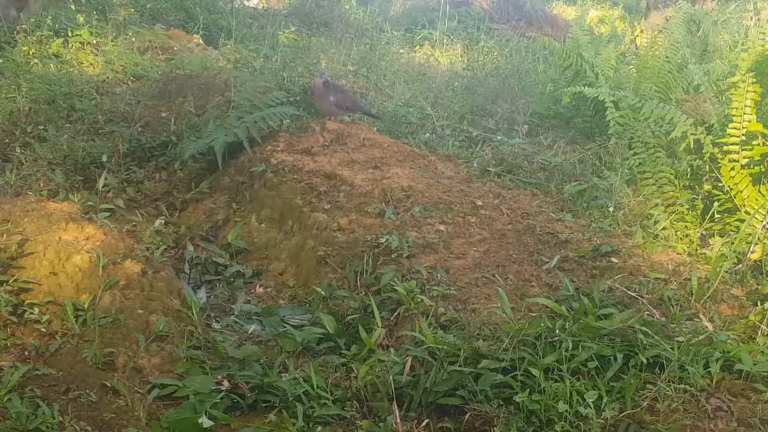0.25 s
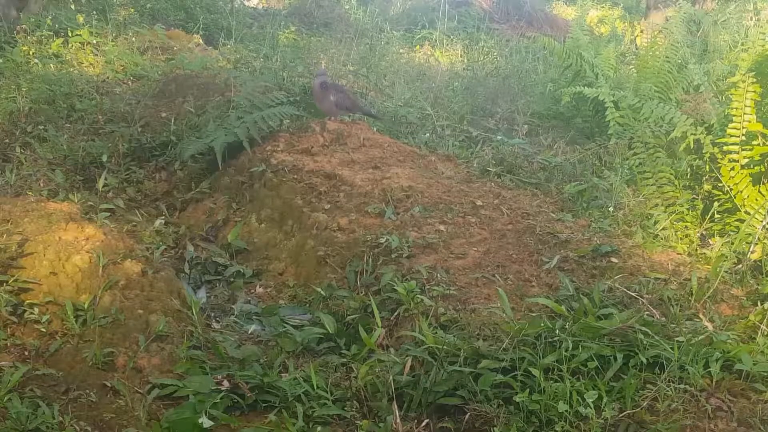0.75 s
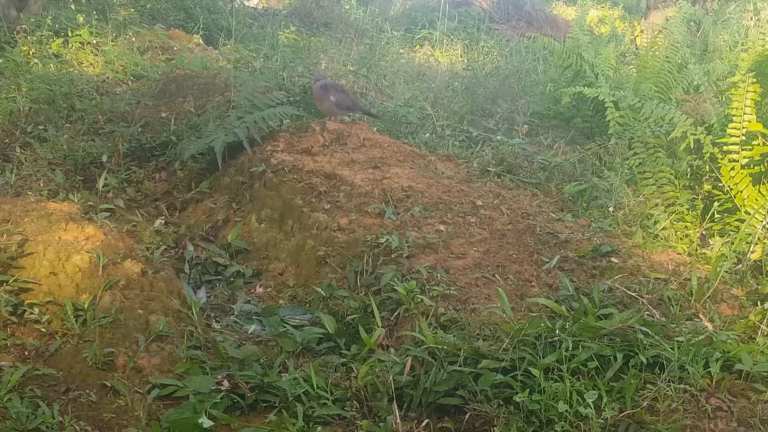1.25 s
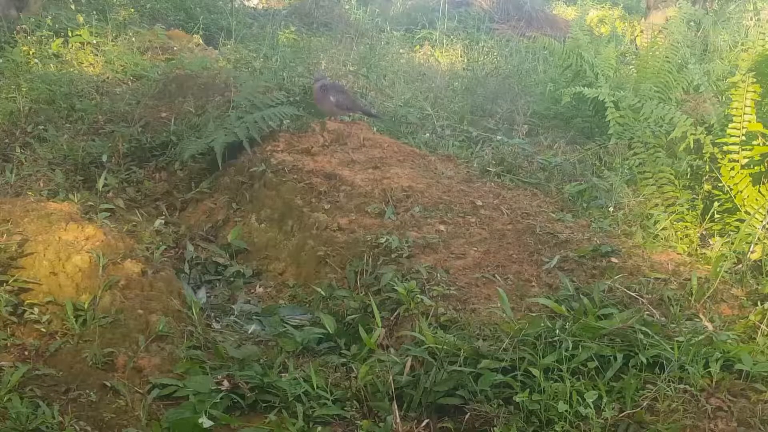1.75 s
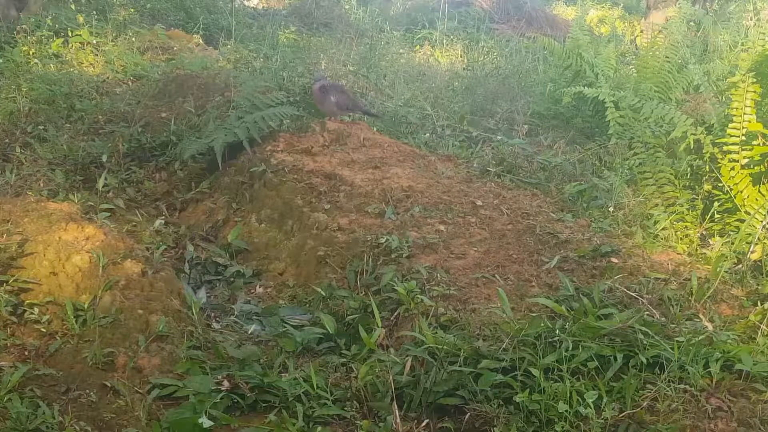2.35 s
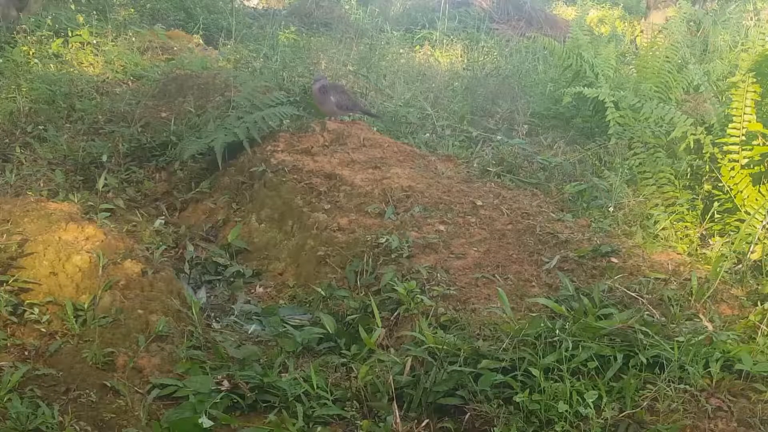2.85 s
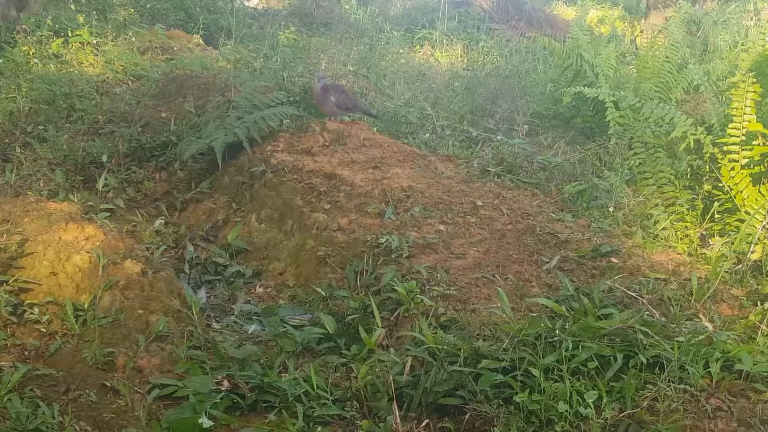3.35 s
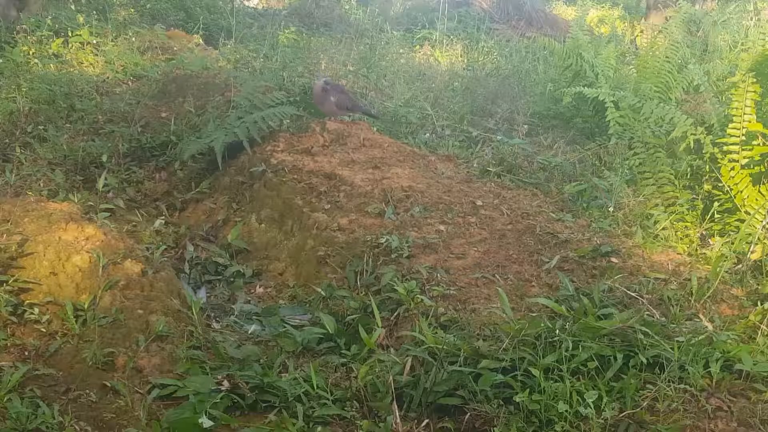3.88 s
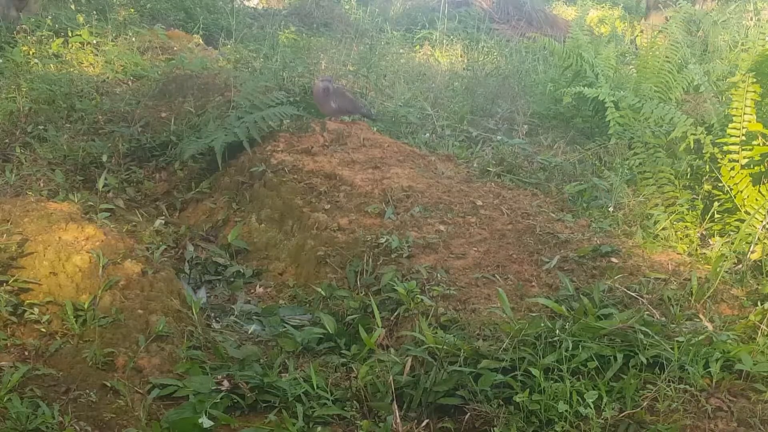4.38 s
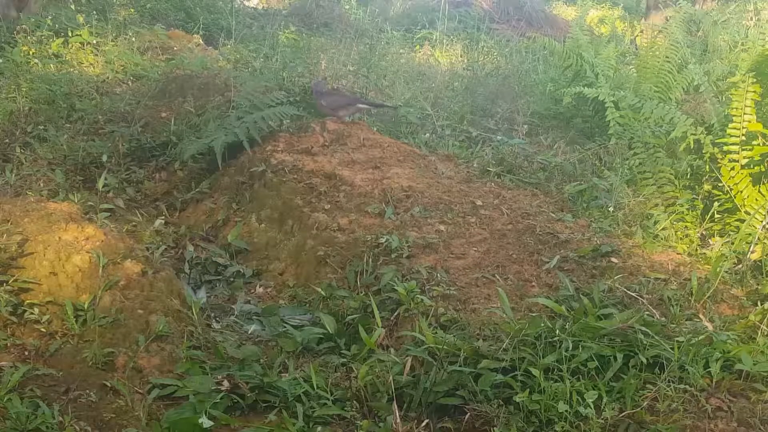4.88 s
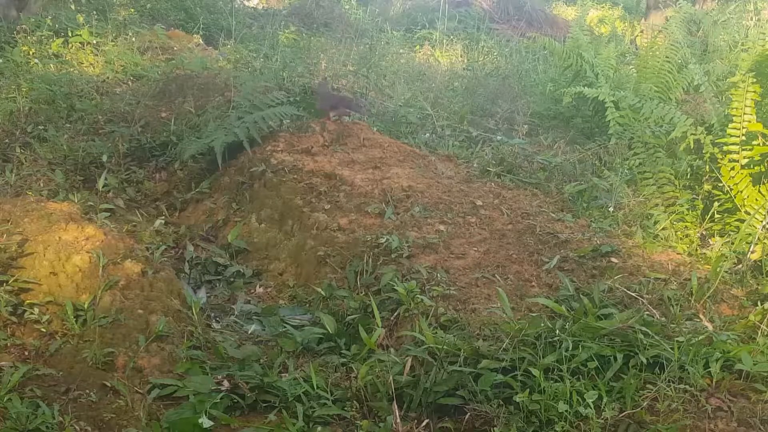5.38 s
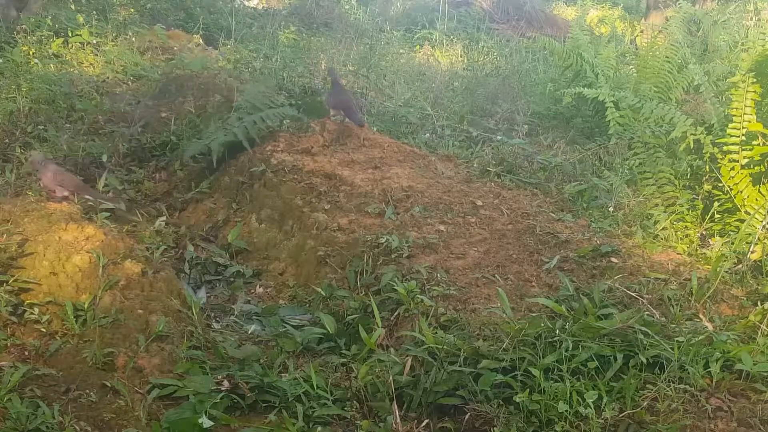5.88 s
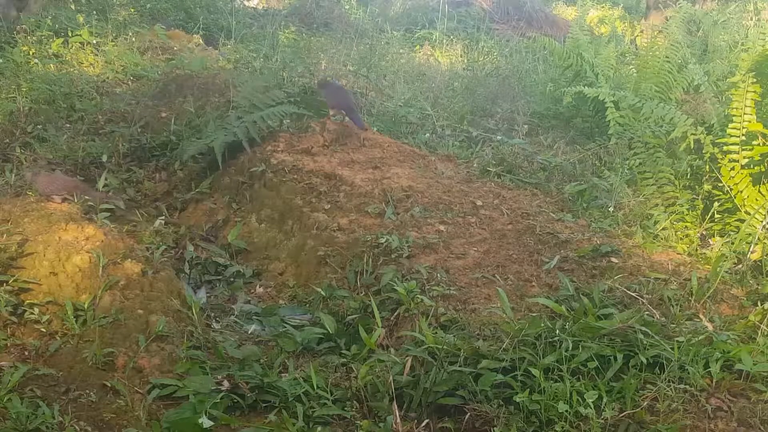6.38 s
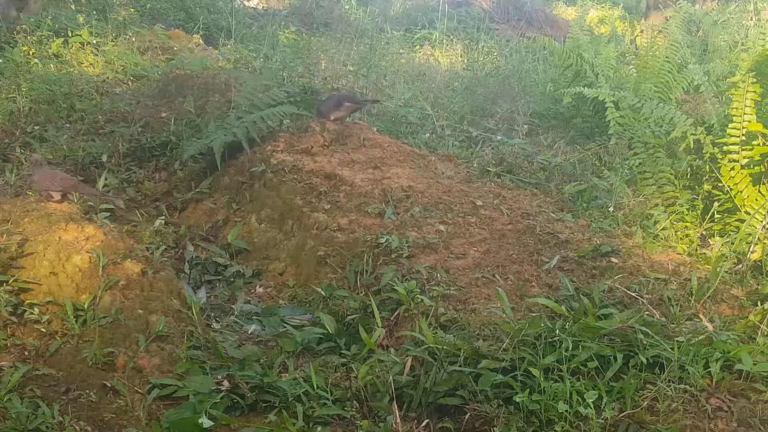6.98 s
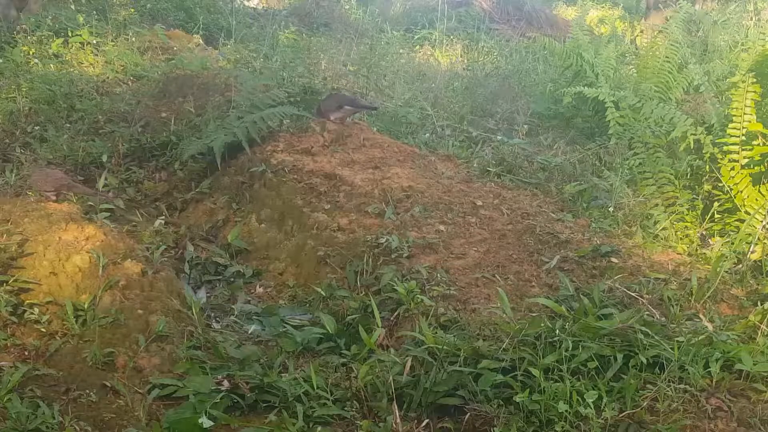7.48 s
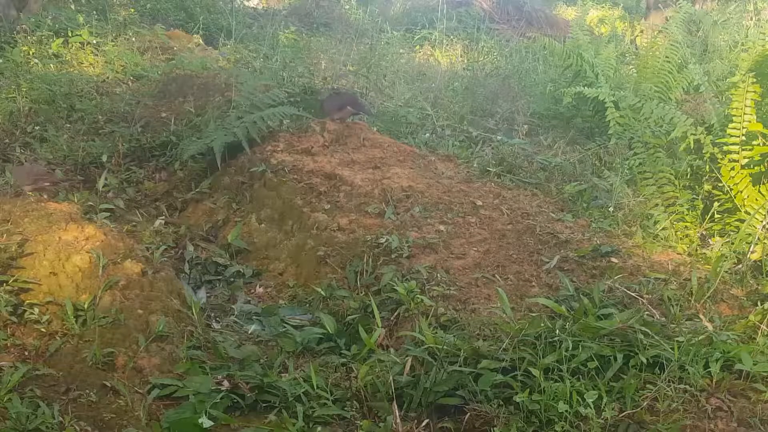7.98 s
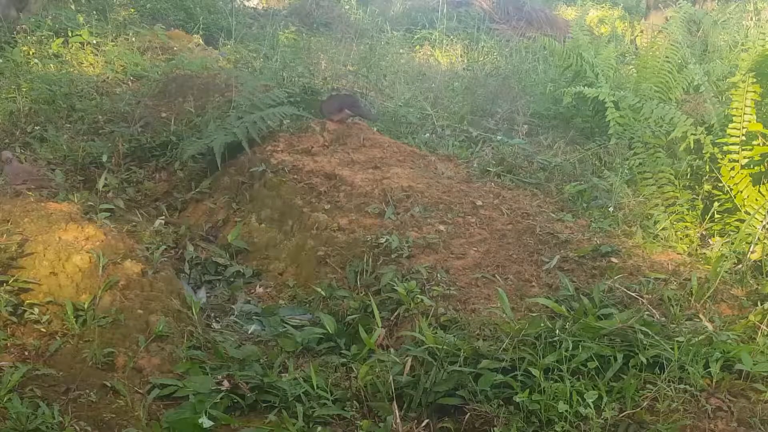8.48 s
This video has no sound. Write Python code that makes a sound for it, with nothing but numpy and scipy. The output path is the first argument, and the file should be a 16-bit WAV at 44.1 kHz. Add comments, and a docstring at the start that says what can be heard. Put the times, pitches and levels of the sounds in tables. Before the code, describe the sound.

Outdoors in a scrubby clearing, a bush cricket chirps rapidly and thinly over insect fizz and very light air. A distant dove on the left coos softly at the start and again near three seconds, around a louder near dove's clear double coo and long purring note. Mid-way, wings flap in with soft low thumps and a breathy rush. Then the near dove gives a run of hoarse, beating coos, ending as a clear coo starts. The stereo microphone is open and quiet.

```python
"""Doves in a scrubby clearing

One dove coos far off to the left, one close by, and a bird lands with a flurry of wings.
Each coo is two throat tones that beat against each other; the wings are puffs, slaps and rushes of noise.
A bush cricket's gated wing tone chirps in threes, and a chorus of smaller insects fizzes as narrow noise.
Swept sines make faint whistles and trills, decaying sines make far knocks, and hiss swells softly.
Light wind and still air are bands of flickering noise, heaviest at the bottom."""
import sys
import numpy as np
from scipy import signal
from scipy.io import wavfile

SR = 44100
rng = np.random.default_rng(int(sys.argv[2]) if len(sys.argv) > 2 else 0)


def master(y):
    """Save y as 16-bit WAV."""
    cut = np.clip(np.atleast_2d(y).T, -1, 1)
    pcm = np.round(cut * 32767)  # scale
    wavfile.write(sys.argv[1], SR, pcm.astype(np.int16))


N = 384993
T = np.arange(N) / SR   # [s]

# Light wind, still air and far leaves: (frequency [Hz], relative density [dB per Hz])
AIR_SPECTRUM = [(15, -24), (30, -7), (60, -3), (140, -9.5), (230, -14), (700, -20.5), (2200, -24),
                (4000, -24), (6200, -64), (8300, -24.5), (9800, -30), (12500, -32), (14500, -36)]
AIR_DB = -62   # level of the whole bed
# Stereo lean of the noise beds: (frequency [Hz], left minus right [dB])
NOISE_LEAN = [(30, -7), (80, -5), (200, -1), (1500, -2.5), (15000, 2)]
# Likeness of the two sides of the noise beds: (frequency [Hz], left-right likeness [0-1])
NOISE_LIKENESS = [(30, .35), (200, .85), (600, .7), (2000, .1)]
# Small insects: (time [s], fizz level [dB], thin tone level [dB])
CHORUS_LEVELS = [(0, -57.5, -70), (8.73, -58.5, -72)]
# Chirps of the cricket: (time [s], rate [chirps per s])
CHIRP_RATE = [(0, 17.499), (1.04, 18.076), (2.92, 16.863), (3.31, 17.577), (4.9, 19.427), (5.02, 19.315),
              (6.39, 18.775), (7.26, 18.643), (8.73, 18.058)]
CHIRP_START = .135   # part of a chirp already sung at 0 s
# Wing strokes in a chirp: (place [part of chirp], width [part of chirp], level [dB], wing tone [Hz])
CHIRP_STROKES = [(.14, .045, -8, 6674), (.36, .045, 0.5, 6857), (.6, .05, 1.5, 6920), (.75, .07, -16, 6907)]
# Cricket, before scatter and pan: (time [s], wing tone level [dB], rasp level [dB], octave level [dB])
CRICKET_LEVELS = [(0, -58, -63, -63), (4.3, -58, -62, -63), (6, -57, -55.5, -62.5),
                  (8.73, -59.5, -52.5, -63.5)]
# Soft swells of hiss, perhaps far leaves: (centre time [s], half length [s], level [dB])
RUSTLE_SWELLS = [(1.38, 0.17, -68), (1.9, 0.2, -69.5), (3.85, 0.16, -73), (7.452, 0.2, -68.5)]
# Soft far knocks: (time [s], starting level [dB], pitch [Hz])
FAR_KNOCKS = [(3.767, -54, 571), (3.968, -55, 556), (4.369, -56.5, 568)]
# Faint whistles: (start [s], end [s], start pitch [Hz], end pitch [Hz], level [dB])
FAINT_WHISTLES = [(.08, .35, 1950, 2380, -73), (1.25, 1.68, 3000, 2750, -75), (1.7, 1.9, 2320, 2320, -75),
                  (2.7, 2.97, 2840, 2840, -74)]
WHISTLE_SHAKE_HZ = 70
# A small bird's groups of three falling notes: (time [s], level of the first note [dB])
BIRD_TRILLS = [(2.425, -61), (2.665, -62), (2.905, -61), (3.145, -62)]
# Returns from ground and bushes: (left delay [s], left level [dB], right level [dB])
ECHO_RETURNS = [(.009, -48, -11.5), (.023, -12.5, -22), (.047, -14.5, -18), (.1, -22, -24)]
# Wing beats and the landing: (time [s], puff level [dB], puff pitch [Hz], feather slap level [dB])
WING_BEATS = [(5.305, -48.5, 327, -71), (5.331, -56, 159, -66), (5.352, -45, 270, -62),
              (5.408, -48, 259, -63), (5.45, -35.5, 348, -58), (5.484, -59, 320, -57),
              (5.503, -44, 103, -69), (5.53, -34, 440, -66), (5.559, -46, 129, -39), (5.594, -54, 116, -63),
              (5.62, -43, 270, -55), (5.662, -46, 225, -57), (5.698, -45, 102, -65), (5.725, -39, 145, -54),
              (5.784, -49, 161, -64)]
# Air rushing with the beats, before grain: (time [s], level [dB])
RUSH_LEVELS = [(5.2, -64), (5.4, -54), (5.53, -52.5), (5.68, -56), (5.85, -63)]
# Colour of that rush: (frequency [Hz], relative density [dB per Hz])
RUSH_SPECTRUM = [(40, -7.5), (300, -5.5), (700, -12.5), (1200, -13.5), (2200, -21.5), (9000, -30.5)]
RUSH_RISE_S, RUSH_BETWEEN = 0.012, 0.25   # rise of each rush; share that lasts between beats
# Far dove's phrase, one table for each of three notes: (time into the phrase [s],
# low tone [Hz], low tone level [dB], high tone [Hz], high tone level [dB])
FAR_PHRASE = [
    [(0, 496, -77, 587, -87), (.06, 570, -66, 640, -92), (.12, 485, -69, 600, -81)],
    [(.212, 590, -83, 689, -69), (.257, 597, -57, 701, -72), (.308, 645, -51, 732, -72),
     (.345, 645, -83, 734, -80)],
    [(.44, 612, -89, 711, -82), (.468, 617, -53.5, 710.5, -60.5), (.515, 631.6, -63, 778, -55),
     (.56, 663, -61, 808, -64), (.61, 635.3, -61.5, 708, -62), (.68, 631, -53, 719, -67.5),
     (.73, 608, -60, 660, -74), (.79, 552, -70, 627, -84), (.88, 479, -70, 580, -88)],
]
# When the far dove starts its phrase: (time [s], level change [dB])
FAR_STARTS = [(-.105, -0.1), (2.82, -0.7)]
# Near dove's clear double note, long purred note and start of the next, one table a note:
# (time [s], low tone [Hz], low tone level [dB], high tone [Hz], high tone level [dB])
CLEAR_SONG = [
    [(1.18, 379, -66, 506, -85), (1.2, 508, -53.5, 619, -53), (1.225, 627, -37.5, 698, -72),
     (1.25, 597, -41, 700, -66), (1.3, 475, -51.5, 602, -65), (1.36, 505, -55.5, 594, -56.5),
     (1.41, 589, -47, 645, -52.5), (1.455, 608, -43, 680, -49), (1.49, 628, -33, 700, -54),
     (1.52, 647, -32.5, 690, -75), (1.55, 621, -37.5, 680, -75), (1.585, 570, -46, 650, -64),
     (1.6, 448, -52.5, 610, -67), (1.62, 432, -93, 593, -86)],
    [(1.77, 506, -68, 597, -66), (1.785, 572, -45, 635, -51), (1.815, 628, -39, 684, -40),
     (1.85, 654, -39, 699, -40.5), (1.97, 634, -34.5, 684, -44.5), (2.025, 618, -33, 695, -43.5),
     (2.06, 624, -32, 710, -61), (2.1, 610, -37, 670, -61), (2.12, 583, -40.5, 646, -55),
     (2.18, 556, -43, 625, -61), (2.25, 509, -55, 576, -75), (2.28, 447, -48, 549, -58),
     (2.3, 400, -97, 497, -87)],
    [(8.6, 432, -69, 524, -86), (8.62, 516, -52, 635, -49), (8.645, 612, -43.5, 698, -46),
     (8.665, 623, -40, 702, -35.5), (8.69, 640, -54, 708, -31.5), (8.78, 625, -64, 700, -27)],
]
# Throat in each clear note: (left minus right [dB], hoarseness [0-1], breath [dB], octave [dB])
CLEAR_VOICE = [(2.5, 0.17, -26, -59.5), (2.5, 0.3, -29, -61), (3.5, 0.17, -14, -52)]
# Near dove's hoarse run, a row a note, first and last being the two ends of its held part:
# (held from [s], held to [s], low tone first [Hz], last [Hz], its level first [dB], last [dB],
#  high tone above low by [Hz], its level first [dB], last [dB],
#  left minus right [dB], hoarseness [0-1], breath [dB], octave [dB])
HOARSE_RUN = [(6.469, 6.532, 631, 601, -54.5, -57.5, 98.5, -47, -50, 2, 0.28, -6, -28),
              (6.663, 6.856, 592.5, 571, -47.5, -45, 112.8, -47.5, -56.5, 1.5, 0.62, -12, -53),
              (7.062, 7.365, 595, 601.4, -47.5, -42, 129.4, -49.5, -49.5, 2, 0.65, -13, -52),
              (7.491, 7.692, 591.6, 536.5, -40.5, -47.5, 133.6, -49.5, -65, -0.5, 0.72, -18, -54),
              (7.981, 8.098, 605, 603, -47.5, -45, 108.4, -44, -42, 2, 0.18, -14.5, -47),
              (8.29, 8.502, 592.4, 609, -46.5, -41.5, 135, -47.5, -48, 2.5, 0.7, -11, -58.5)]
# Scoop before the hold, relative to its start:
# (time [s], pitch offset [Hz], low tone level [dB], high tone level [dB])
SCOOP = [(-.042, -175, -19, -28), (-.03, -140, -8.5, -6.5), (-.014, -47.5, -4.5, -6.5)]
# Drop after the hold, relative to its end:
# (time [s], pitch offset [Hz], low tone level [dB], high tone level [dB])
DROP = [(.015, -36, -5, -11.5), (0.036, -125, -12, -12), (.047, -150, -33, -34)]
OVERSHOOT_HZ, SETTLE_S = 17.7, .05   # the scoop passes the held pitch and comes back
CATCH_S, CATCH_DB, CATCH_WIDTH_S = 7.643, -10.5, 0.012   # the voice catches once in mid note
MIC_TOP_HZ, CUTOFF_HZ = 15800, 15746   # soft roll-off; edge where the steep cut is complete


def amp(db):
    """Turn dB into gain."""
    return 10 ** (np.asarray(db) / 20)


def rms_one(x):
    """Scale to rms 1."""
    return x / np.sqrt(np.mean(x ** 2) + 1e-20)


def in_time(rows, t=T):
    """Read the columns of a curve at times t."""
    s, *columns = np.transpose(rows)
    return [np.interp(t, s, column) for column in columns]


def at_hz(points, hz):
    """Read a spectrum on a log-frequency axis."""
    point_hz, values = np.transpose(points)
    return np.interp(np.log(hz), np.log(np.maximum(point_hz, 1)), values)


def drift(rate_hz):
    """Wander at random with spread 1: noise through two equal low-pass poles, at a twentieth of SR."""
    r = np.exp(-40 * np.pi * rate_hz / SR)
    noise = rng.standard_normal(N // 20 + 4002)
    slow = signal.lfilter([1], [1, -2 * r, r * r], noise)[4000:]
    return np.interp(np.arange(N) / 20, np.arange(len(slow)), rms_one(slow - slow.mean()))


def band(x, low_hz, high_hz):
    """Band-pass."""
    return signal.sosfilt(signal.butter(2, [low_hz, high_hz], "band", fs=SR, output="sos"), x)


def fizz(hz, width_hz, channels=1):
    """Pass noise twice through a resonance, at rms 1."""
    r = np.exp(-np.pi * width_hz / SR)
    section = [1, 0, -1, 1, -2 * r * np.cos(2 * np.pi * hz / SR), r * r]
    return rms_one(signal.sosfilt([section, section], rng.standard_normal((channels, N))))


def turns(hz):
    """Run up the phase of a moving pitch."""
    return 2 * np.pi * np.cumsum(hz) / SR


def place(x, lean_db, lag=0):
    """Pan by level, with the right side `lag` samples later (sooner if negative)."""
    late = x[np.clip(np.arange(N) - round(lag), 0, N - 1)]
    return np.stack([x * amp(lean_db / 2), late * amp(-lean_db / 2)])


def echoes(x, wet_db):
    """Add a few dull returns from ground and bushes, with other delays and levels on each side."""
    out, dull = np.zeros((2, N)), band(x, 140, 1500)
    for s, *side_db in ECHO_RETURNS:
        for side in range(2):
            lag = round(s * (1 + 0.1305 * side) * SR)   # the right return comes later
            out[side, lag:] += amp(side_db[side] + wet_db) * dull[:-lag]
    return out


def coloured(spectrum, patchy_db):
    """Sum half-octave bands of stereo noise, each with its own level, flicker, lean and likeness."""
    out, gust, edges = 0, drift(4.5), 20 * 2 ** np.arange(0, 10, .5)
    white = rng.standard_normal((2, 2, N))
    for k, (low, high) in enumerate(zip(edges, edges[1:])):
        mid, side = band(white[k % 2], low, high)   # neighbouring bands use separate noise
        hz = np.sqrt(low * high)
        alike = np.clip(at_hz(NOISE_LIKENESS, hz), 0, 1)
        flicker_db = patchy_db * (300 / hz) ** 0.11 * (0.43 * gust + drift(7.6))
        gain = amp(at_hz(spectrum, hz) + flicker_db)
        lean = amp(at_hz(NOISE_LEAN, hz) / 2 * np.array([[1], [-1]]))
        stereo = np.sqrt(1 + alike) * mid + np.sqrt(1 - alike) * side * [[1], [-1]]
        out = out + gain * lean * stereo
    return out / np.sqrt(np.mean(out.mean(axis=0) ** 2))


def air():
    """Light wind rumble, still air and far leaves: broad noise, heaviest at the bottom."""
    return amp(AIR_DB) * coloured(AIR_SPECTRUM, patchy_db=2.5)


def chorus():
    """Many small insects: a fizz pulsing fast and throbbing slowly, and one thin steady tone."""
    fizz_db, thin_db = in_time(CHORUS_LEVELS)
    pulse = 1 + 0.21 * np.sin(turns(80 + 4 * drift(2.26)))
    throb = amp(1.68 * np.sin(turns(5.5 + 1.16 * drift(0.74))))
    own, shared = fizz(5340, 730, channels=2), fizz(5470, 970)
    cloud = rms_one((own + 0.33 * shared) * pulse * throb) * amp([[-1.3], [1.3]])
    thin = fizz(7530, 54) + 1.96 * fizz(7530, 160, channels=2)
    return amp(fizz_db) * cloud + amp(thin_db) * thin


def rustles():
    """Soft swells of broad, flickering hiss."""
    swell = 0
    for s, half_s, level_db in RUSTLE_SWELLS:
        swell = swell + amp(level_db) * np.exp(-.5 * ((T - s) / half_s) ** 2)
    return swell * amp(2.0 * drift(20)) * fizz(2370, 2000, channels=2)


def strokes(count, spread_db):
    """Envelope, wing tone and progress (-1 to 1) of the strokes: soft bumps of chance strength."""
    whole, part = np.floor(count).astype(int), count % 1
    luck = rng.standard_normal((whole.max() + 2, len(CHIRP_STROKES)))[whole + 1]
    at, length, level_db, hz = np.transpose(CHIRP_STROKES)[:, :, None]
    along = (part - at) / length
    bumps = amp(level_db + spread_db * luck.T) * np.exp(-.5 * along ** 2) + 1e-4
    swell = bumps.sum(axis=0)
    wing_hz = (hz * bumps).sum(axis=0) / swell
    progress = (np.tanh(along) * bumps).sum(axis=0) / swell
    return swell, wing_hz, progress


def cricket():
    """A wing tone with its octave, wavering as the scraper slips, and a falling rasp just above it."""
    count = CHIRP_START + np.cumsum(in_time(CHIRP_RATE)[0]) / SR
    tone_db, rasp_db, octave_db = in_time(CRICKET_LEVELS)
    swell, hz, _ = strokes(count, spread_db=-0.5)
    phase = turns(hz + 45 * drift(150))
    smear = signal.lfilter([.004], [1, -.996], swell)   # leaves scatter the tone between strokes
    tone = rms_one(swell * np.sin(phase))
    tone = tone + amp(-5) * rms_one(smear * fizz(6880, 260, channels=2))
    octave = rms_one(swell * np.sin(2 * phase))
    octave = octave + amp(-2) * rms_one(smear * fizz(13900, 1200, channels=2))
    # the rasp runs slightly ahead of the tone
    early, _, along = strokes(count + 0.0238, spread_db=2.0)
    rasp_phase = turns(7330 - 200 * along + 40 * drift(137.0))
    rasp = rms_one(early ** 1.67 * np.sin(rasp_phase))
    rasp = rasp + amp(-6) * fizz(7250, 400, channels=2)
    left = amp(tone_db + 1.2) * tone[0] + amp(rasp_db + 1.5) * rasp[0] + amp(octave_db + 5) * octave[0]
    right = amp(tone_db - 1.2) * tone[1] + amp(rasp_db - 1.5) * rasp[1] + amp(octave_db - 7) * octave[1]
    return np.stack([left, np.roll(right, -7)])   # the right side hears it slightly sooner


def far_sounds():
    """Hollow knocks (decaying sines), wavering whistles and quick trills (swept sines) deep in the scrub."""
    out = np.zeros(N)
    for s, level_db, hz in FAR_KNOCKS:
        t = np.maximum(T - s, 0)
        out += amp(level_db) * np.sin(2 * np.pi * hz * t) * np.exp(-t / 0.0092)
    trill_notes = []
    for s, level_db in BIRD_TRILLS:
        for k in range(3):
            start = s + k * .034
            louder_db = 3 * min(k, 1)   # the second and third notes stand out
            trill_notes.append((start, start + .024, 5400, 4550, level_db + louder_db))
    waver, shake_hz = drift(30), WHISTLE_SHAKE_HZ * drift(77)
    for start, end, start_hz, end_hz, level_db in FAINT_WHISTLES + trill_notes:
        span = slice(round(start * SR), round(end * SR))
        done = np.linspace(0, 1, span.stop - span.start)
        swell = amp(level_db + 2 * waver[span]) * np.sqrt(np.abs(np.sin(np.pi * done)))
        out[span] += swell * np.sin(turns(start_hz + (end_hz - start_hz) * done + shake_hz[span]))
    return place(out, 1.5) + echoes(out, 4.8)


def wings():
    """Each beat is a low push of air a few cycles long, a slap of feathers and a short rush."""
    out, rush, t = np.zeros(N), np.zeros(N), T[:3000]
    slaps = signal.lfilter([1], [1, -.7], rng.standard_normal((len(WING_BEATS), 3000)))
    for (s, puff_db, hz, slap_db), slap in zip(WING_BEATS, slaps):
        late, at = t - .008, round(s * SR)   # the puff peaks 8 ms after the slap
        puff = np.exp(-.5 * (late / 0.003) ** 2) * np.cos(2 * np.pi * hz * late)
        out[at:at + 3000] += amp(puff_db) * (puff - puff.mean())
        out[at:at + 3000] += amp(slap_db) * slap * np.exp(-t / 0.0028)
        rush[at:at + 3000] += t / RUSH_RISE_S * np.exp(1 - t / RUSH_RISE_S)
    inside_s = np.minimum(T - RUSH_LEVELS[0][0], RUSH_LEVELS[-1][0] - T)
    rush += RUSH_BETWEEN * np.clip(inside_s * 10, 0, 1)
    rush *= amp(in_time(RUSH_LEVELS)[0] + 4 * np.tanh(drift(90)))   # feathers make it grainy
    return place(out, .5) + echoes(out, -12.0) + rush * coloured(RUSH_SPECTRUM, patchy_db=4.0)


def hoarse_note(start, end, hz, end_hz, low_db, end_low_db, gap_hz, high_db, end_high_db):
    """Shape one note of the run: scoop up, overshoot, hold, drop."""
    def edge(rows, s, hz, low_db, high_db):
        """Shift relative rows to their place, with the high tone a fixed gap above the low one."""
        return [(s + ds, hz + dhz, low_db + dl, hz + dhz + gap_hz, high_db + dh) for ds, dhz, dl, dh in rows]
    first = edge(SCOOP + [(0.0023, 0, 0, 0)], start, hz + OVERSHOOT_HZ, low_db, high_db)
    last = edge([(0.0034, 0, 0, 0)] + DROP, end, end_hz, end_low_db, end_high_db)
    done = np.clip(SETTLE_S / (end - start), 0, .9)   # part of the hold gone once the pitch settles
    without_overshoot = np.array(first[-1]) - [0, OVERSHOOT_HZ, 0, OVERSHOOT_HZ, 0]
    settled = (1 - done) * without_overshoot + done * np.array(last[0])
    return first + [settled] + last


def coo(rows, hoarse, breath_db, octave_db, shake, breath):
    """Two membranes, their octaves, and the sum-and-difference tones of their coupling."""
    ends = np.round(np.array([rows[0][0], rows[-1][0]]) * SR)
    span = slice(*np.clip(ends, 0, N).astype(int))
    low_hz, low_db, high_hz, high_db = in_time(rows, T[span])
    low = np.sqrt(2) * amp(low_db)
    high = np.sqrt(2) * amp(high_db + 5.5 * hoarse * shake[0, span])
    a = turns(low_hz + 5.5 * hoarse * shake[1, span])
    beat = turns(high_hz - low_hz + 9.0 * hoarse * shake[2, span])
    alone = low / (low + high)   # near 1 when only the low membrane swings
    both = high * alone          # coupling needs both membranes
    tone = low * np.sin(a) + high * np.sin(a + beat)
    # the low octave levels off when loud
    tone += amp(octave_db) * np.tanh(low / amp(-40)) * alone ** 2 * np.sin(2 * a)
    tone += amp(-36) * high * np.sin(2 * (a + beat))
    # the throat passes only lines close to the tones
    step = np.exp(-(high_hz - low_hz) / 75)
    lagging = sum(step ** k * np.sin(a + (k + 1) * beat - 1.1 * k) for k in range(1, 6))
    tone += both * lagging       # each beat swells, rises in pitch and snaps shut
    tone += both * amp(-19) * np.sin(a - beat)
    # strong-weak beats: a line halfway between the tones
    tone += both * hoarse * 1.22 * (1 + np.tanh(shake[3, span])) * np.sin(a + beat / 2)
    # air puffs once a beat
    tone += both * amp(breath_db) * breath[span] * (1 + np.cos(beat))
    out = np.zeros(N)
    out[span] = tone
    return out


def doves():
    """Two beating throats: the near bird's echoes faint beside it, the far one wetter and to the left."""
    shake = np.stack([drift(31) for _ in range(4)])
    breath = rms_one(band(band(rng.standard_normal(N), 740, 1050), 600, 1350))
    notes = list(zip(CLEAR_SONG, CLEAR_VOICE))
    notes += [(hoarse_note(*row[:-4]), row[-4:]) for row in HOARSE_RUN]
    near = 0
    for rows, (lean_db, *throat) in notes:
        near = near + place(coo(rows, *throat, shake, breath), lean_db, lag=3.9)
    near = near * amp(CATCH_DB * np.exp(-.5 * ((T - CATCH_S) / CATCH_WIDTH_S) ** 2))
    far = np.zeros(N)
    for s, level_db in FAR_STARTS:
        for rows in FAR_PHRASE:
            shifted = np.add(rows, [s, 0, 0, 0, 0])
            far += amp(level_db) * coo(shifted, 1.27, -47, -88, shake, breath)
    near_wet = near + echoes(near.mean(axis=0), 0.0)
    far_wet = place(far, 7.2, lag=-9.5) + echoes(far, 4.2)
    return near_wet + far_wet


def scene():
    """Layer all sources over the air."""
    return air() + chorus() + rustles() + cricket() + far_sounds() + wings() + doves()


def record(dry):
    """The microphone fades at the top, then the band ends."""
    faded = signal.sosfilt(signal.butter(14, MIC_TOP_HZ, fs=SR, output="sos"), dry)
    return signal.sosfilt(signal.cheby2(12, 70, CUTOFF_HZ, fs=SR, output="sos"), faded)


dry = scene()
out = record(dry)
master(out)
```